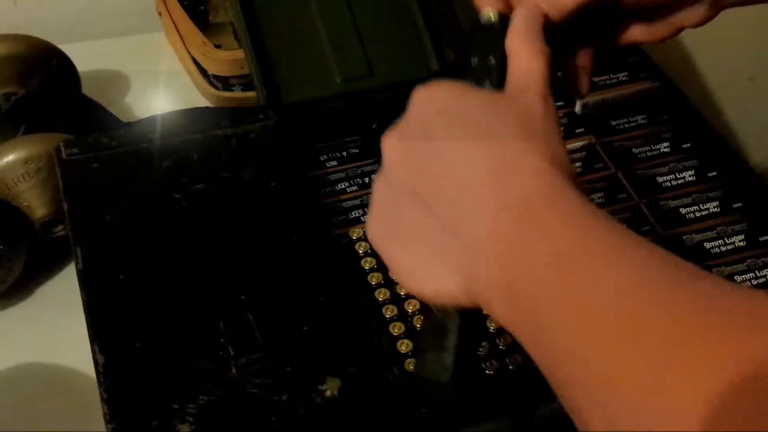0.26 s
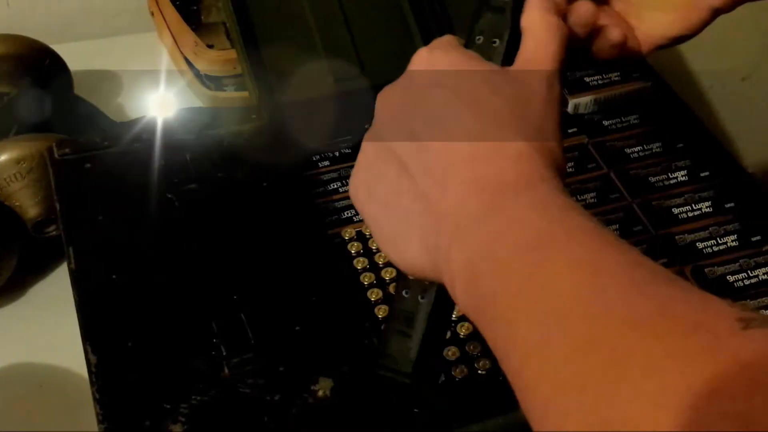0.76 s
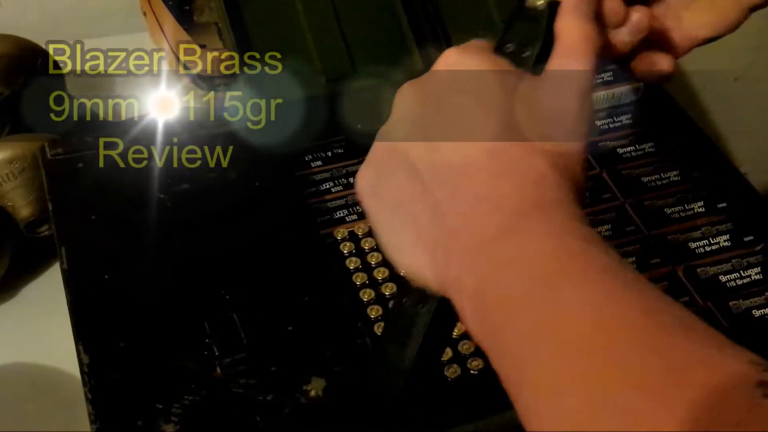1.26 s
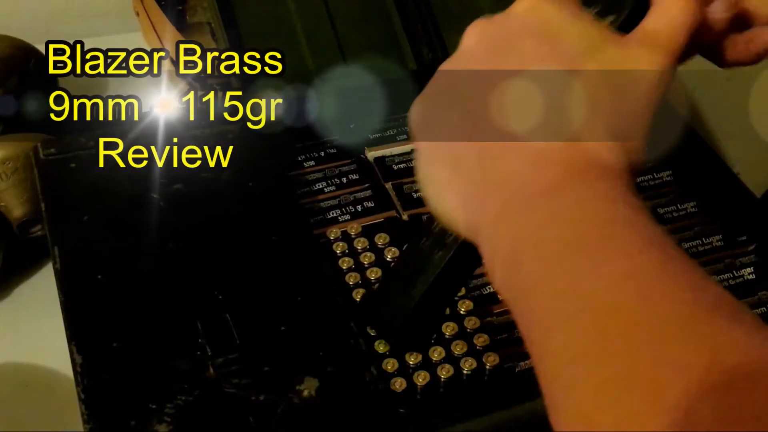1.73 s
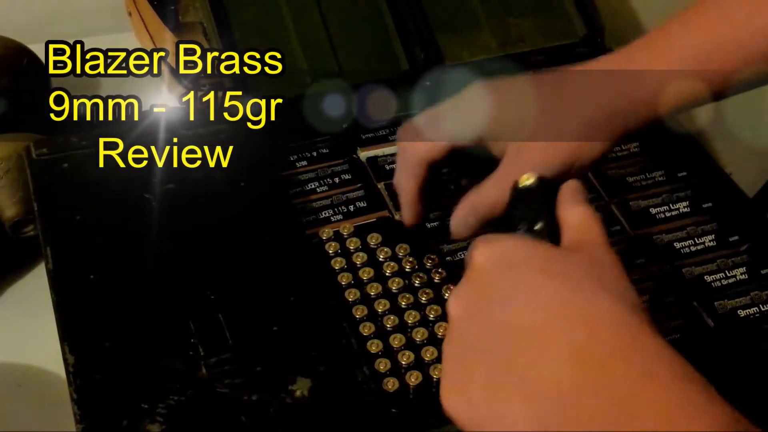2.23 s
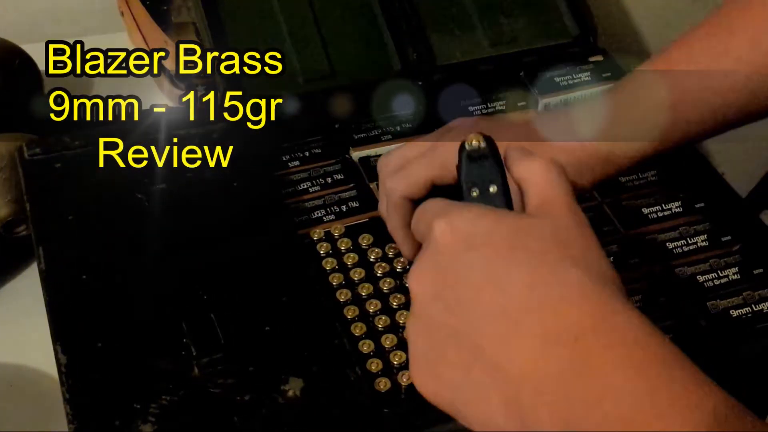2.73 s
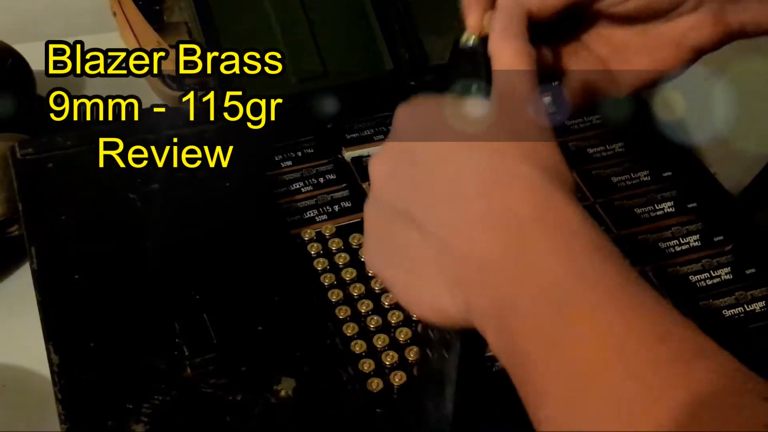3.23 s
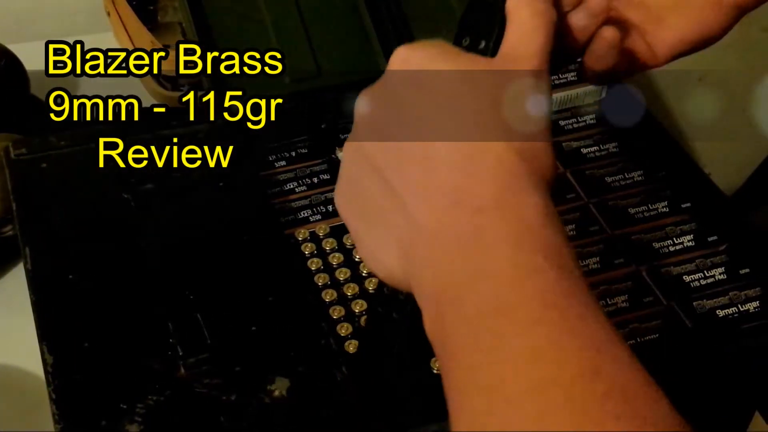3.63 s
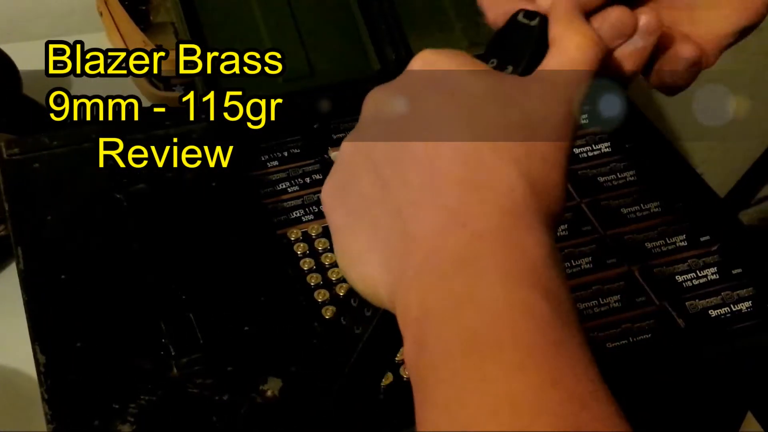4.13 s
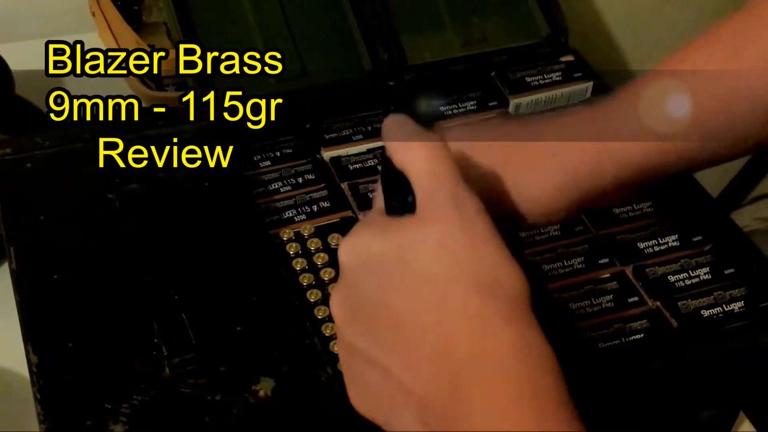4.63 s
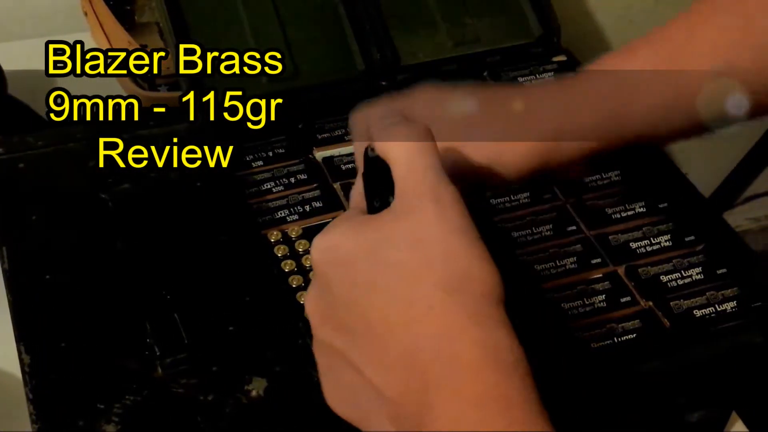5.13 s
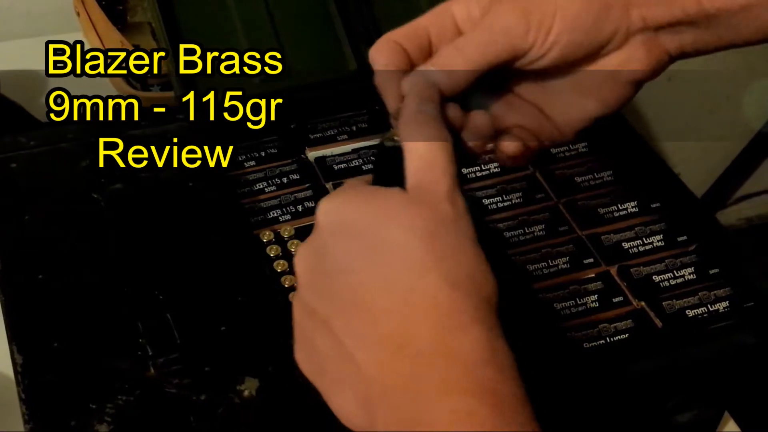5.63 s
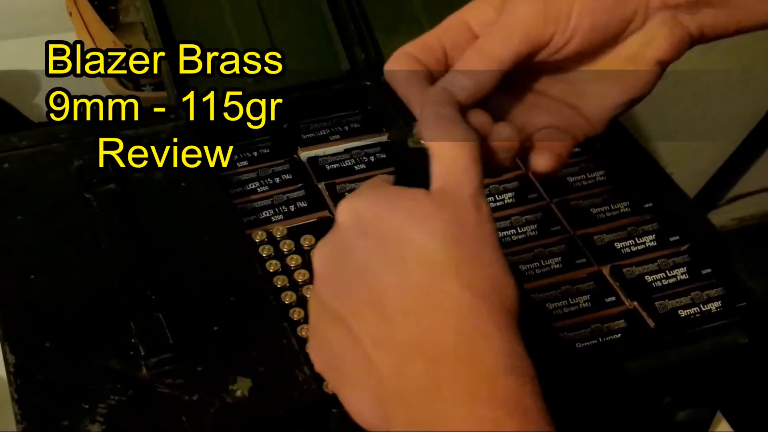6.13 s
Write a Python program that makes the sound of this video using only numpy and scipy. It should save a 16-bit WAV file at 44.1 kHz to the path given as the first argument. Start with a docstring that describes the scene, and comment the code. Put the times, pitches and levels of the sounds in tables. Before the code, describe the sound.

After a blink of silence, a quiet indoor room opens with low fan rumble, faint wavering hum and hiss. Small metallic ticks come at about 0.3 to 0.6 seconds, then weak taps and faint skin-and-brass rubbing until 1.5. From 1.6 to 2.1 a cluster of hard, bright brass-on-steel clicks snaps out, strongest near 1.67, 1.85 and 2.06. Softer, duller plastic tray ticks and slides follow from 2.4, with a clearer knock at 2.94. One moderate click lands at 3.26, then near-quiet. Light ticks at 3.9 lead to the loudest, brightest clatter at 4.28 to 4.43, and a smaller click at 4.56. Tray rattles run from 4.74 to 5.1, a crisp click comes at 5.6, then barely audible touches near 6.15. Everything is close, slightly left, with short diffuse room tails.

```python
"""Loading a magazine at the table

Hands load brass cartridges into a steel pistol magazine over a table, close to a small stereo camera.
Cartridges plucked from a plastic tray and clicks at the feed lips are sharp blows into resonant modes.
Fingers and brass slide in between as grainy noise; a hard-walled room answers with diffuse tails.
Behind it lie a faint fan rumble, a wavering hum and hiss, made of shaped noise and sines."""
import sys
import numpy as np
from scipy import signal
from scipy.fft import rfft, irfft, next_fast_len
from scipy.io import wavfile
from scipy.ndimage import map_coordinates

SR = 44100
rng = np.random.default_rng(int(sys.argv[2]) if len(sys.argv) > 2 else 0)


def digitize_waveform(pressure):
    """Quantize a signal to 16-bit integers and store it at the path in sys.argv[1].

    Rows of a 2-D input are taken as channels; values are limited to [-1, 1].
    """
    field = np.atleast_2d(pressure).T
    bounded = np.clip(field, -1, 1)
    quanta = np.round(bounded * 32767).astype(np.int16)
    wavfile.write(sys.argv[1], SR, quanta)


N = 280961  # length in samples


def magazine_clicks():
    """Brass strikes the loaded steel magazine: a strong first blow, then a brief metallic chatter."""
    # Brass on steel. Each row: start in seconds, peak in dB before panning, thud in dB, brightness in dB,
    # favoured frequency in Hz, lift there in dB, room in dB against the near sound, left-right in dB.
    clicks = [(0.312, -48, 13, -10.5, 9000, 12, -2.5, -2), (0.43, -29, -12.5, -3.5, 4200.0, 10, -3.5, -2.5),
              (0.575, -28, -10.5, 0, 3620.0, 8.5, -0.5, -0.5),
              (0.622, -30.5, -15, -17.5, 3800.0, 8, -4, -2), (0.806, -42, -11, -26, 3400, 1.5, -5.5, -2),
              (0.893, -51, -12, -23, 1990, 11, -9, -4), (1.075, -45, 16, -29.5, 2040, 5, -18, -3),
              (1.155, -50.5, -12, -29, 1990, 10.5, -15, -3.5),
              (1.5316, -53.5, -11, -28.5, 2440, 16, -3, -1.5),
              (1.621, -21.5, -23.5, 8.5, 3440.0, 3.5, 0, -1.5),
              (1.6563, -13.5, -19.5, -1.5, 6890.0, 5, 2, -4.5), (1.67, -7, -7, 8.5, 2670, 5.5, -7.5, -1.5),
              (1.6798, -20.5, -12.5, 6.5, 3280.0, 13, -11.5, 3), (1.8428, -25.5, 0.5, 7, 2480, 11, -1, -2),
              (1.851, -11.5, -6, 4.5, 3620.0, 8.5, -4.5, -2.5),
              (1.915, -25, -17, 9.5, 8000.0, 10, -15.5, -2), (1.922, -17, -19.5, -5, 2470, 2.5, -6, -2.5),
              (1.931, -28.5, -11, -13.5, 3440.0, 12.5, -5.5, 1),
              (2.0527, -22, -18, 14, 4410.0, 3.5, 4, 0.5), (2.0568, -12, -5, 17, 1970, 3.5, -10, -1),
              (2.0622, -17, -8, 2, 2640, 2.5, -4, -2.5), (3.261, -27, -9, 0, 2990, 6, -4, -3.5),
              (3.3235, -37, -37, -18, 5650.0, 3, -7, -2), (3.9182, -45.5, -6, -15, 6240.0, 5.5, 2.5, -3.5),
              (3.938, -41.5, -4.5, -4, 4410.0, 18, -7, 1.5), (3.9435, -28, -24.5, 8, 5940.0, 9.5, -11, -4),
              (3.9611, -31, 0.5, 12.5, 5120.0, 6, -7, 1.5), (4.0685, -43, 13, -8.5, 3800.0, 2, -7, -2),
              (4.1577, -50.5, -16, -25.5, 5120.0, 9.5, -4.5, 1),
              (4.1771, -45.5, -17, -22.5, 6560.0, 8, -6.5, -5),
              (4.2774, -20, 1, 5, 6240.0, 9.5, -4.5, -3.5), (4.3335, -20, 0.5, 15.5, 2200.0, 3, -6.5, 3),
              (4.3368, -12.5, -1, 11, 2640, 13.5, -8, -5.5), (4.3405, -8, -21, 10, 6890.0, -1.5, -1, 0),
              (4.3424, -3.5, -36, 14.5, 6560.0, 8, -7.5, 2),
              (4.3466, -16, -18.5, 13, 2220, 17.5, -7.5, -0.5),
              (4.3617, -15, -17.5, 3.5, 8000.0, 11.5, 4.5, -1),
              (4.4285, -11, -20.5, 1.5, 4300, 5.5, -1, -2), (4.5577, -27.5, -13.5, 3.5, 2760, 4, 3, 0),
              (5.25, -43, -14, -1, 8500, 16, -10, -5), (5.6034, -22.5, -7, 8.5, 2610, 15, -8.5, -4.5),
              (5.6072, -32.5, -27, -8, 2480, 2, -4, 1), (5.7331, -44, -6, -4, 6560.0, 24, -12, -2),
              (6.1167, -58, -2, -17.5, 2687, 7.5, -14, -7), (6.1601, -47.5, -27, -24, 3510, 8, -22, -5)]
    # Modes of the loaded magazine. Each row: frequency in Hz, width in Hz, gain in dB.
    magazine = [(590, 320, 1), (1356, 220, -0.5), (1977, 370, 2), (2333, 270, 2), (2700, 140, 6.5),
                (3170, 220, 3), (3480, 360, 2.5), (4300, 450, 0), (4950, 500, -0.5), (5554, 240, 4),
                (6140, 650, 1), (7290, 460, 1.5), (7940, 400, 3.5), (8737, 340, 3), (9430, 470, 4.5),
                (10805, 1000, 5), (11170, 1000, 3), (15400, 4400, -0.5)]
    return contacts(clicks, magazine, first_db=21, rise_s=0.00017, chatter_s=0.0084, deep_db=-6)


def tray_plucks():
    """Cartridges leave the plastic tray: the first blow stands out less and the chatter sets in slowly."""
    # Cartridges leaving the tray. Each row: start in seconds, peak in dB before panning, thud in dB,
    # brightness in dB, favoured frequency in Hz, lift there in dB, room in dB against the near sound,
    # left-right in dB.
    plucks = [(2.41, -51.5, 16, -19, 2060, 8, -0.5, -1), (2.5144, -57, 3, -34, 1920, 11, 3, -1),
              (2.6745, -46, 0, -38, 2100.0, 12, -5, -6), (2.687, -46, -9, -41, 2080, 7, -8, -12),
              (2.6945, -43.5, 4, -15, 3440.0, 16, -6, -4), (2.8057, -39, -24, -38, 2260, 10, -19, -7),
              (2.817, -38.5, -15, -30, 2100, 8, -4.5, -5), (2.9415, -21, -22, -21.5, 1976, 6.5, -7.5, -3.5),
              (4.7383, -36.5, 4, -17, 2204, 12, -8.5, -4.5), (4.7485, -38, 0, 2, 1910, 10, -15, -9),
              (4.7623, -33.5, 0.5, -31, 2340, 8, -6, -11), (4.892, -38, 1.5, -14, 2200, 10, -1.5, -6),
              (4.9037, -32.5, -4, -22, 2310, 14, -7, -6), (4.9245, -37, 2, -11, 2300, 0, -2, 2),
              (4.9325, -29.5, 1, -15.5, 1930, 11.5, -2.5, -5.5), (4.9763, -51, -4, -35, 2200, 10, -10, -3),
              (5.0302, -39, -2, -39, 2390, 7, -4, -6), (5.1028, -21, -19, -27.5, 2100, -5, -5.5, -2.5),
              (5.1118, -25.5, -14, -39, 3280.0, -1, -8.5, -6), (5.347, -50, -13, -33, 2340, 1, 3.5, 1)]
    # Modes of the plastic tray. Each row: frequency in Hz, width in Hz, gain in dB.
    tray = [(455, 1100, -1), (950, 580, 2), (1310, 750, -2.5), (1927, 240, 2.5), (2095, 66, 6),
            (2432, 205, 3), (2974, 295, 3), (3200, 680, 0), (4370, 690, 2), (5150, 170, 4.5),
            (5970, 530, -1), (9600, 620, 3), (11700, 4300, -15.5)]
    return contacts(plucks, tray, first_db=14, rise_s=0.0038, chatter_s=0.0093, deep_db=2)


def contacts(table, modes, first_db, rise_s, chatter_s, deep_db):
    """Each contact drives the modes with a first blow and spiky smaller ones; the room answers each."""
    soft_lingers = 0.25  # softer contacts chatter longer: dB of t60 per dB; chatter_s is t60 at full scale
    size = 8192
    out = np.zeros((2, N + SR))
    t, hz = np.arange(size) / SR, np.fft.rfftfreq(size, 1 / SR)
    kept = t < t[-1] / 2  # drops the wrapped-round half
    for start_s, peak_db, *spot, room_db, pan_db in table:
        struck_db = rng.normal(0, 1.3, len(modes))  # each contact excites the modes a little differently
        body = 0
        for k, (centre, width, gain_db) in enumerate(modes):
            damping = 1j * hz * width
            resonance = damping / (centre ** 2 - hz ** 2 + damping)
            body = body + (-1) ** k * amp(gain_db + struck_db[k]) * resonance
        # where the blow lands sets the balance of the ranges
        body = body * causal(colour(hz, deep_db, peak_db, *spot))

        t60 = chatter_s * amp(-soft_lingers * peak_db)
        spikes_db = 8.0 * rng.standard_normal(size)
        blows = rng.standard_normal(size) * amp(spikes_db - 60 * t / t60)
        blows = blows * (1 - np.exp(-t / rise_s))
        blows[0] = amp(first_db)

        near = irfft(rfft(blows) * body) * kept
        near = near * amp(peak_db) / np.abs(near).max()
        # the room is driven by the ringing body alone, without the chatter
        radiated = unit(irfft(body) * kept) * np.std(near)
        far = amp(room_db) * signal.fftconvolve(radiated[None], room_tail(), axes=1)

        at = round(start_s * SR)
        # the room leans to one side half as far as the near sound
        out[:, at:at + far.shape[1]] += far * amp([[pan_db / 4], [-pan_db / 4]])
        out[:, at:at + size] += near * amp([[pan_db / 2], [-pan_db / 2]])
    return out[:, :N]


def colour(hz, deep_db, peak_db, thud_db, bright_db, favoured_hz, lift_db):
    """Gain in dB of a blow over the modes: thud below, a slope up to the ring, a lift near the struck spot."""
    deep_hz, thud_hz, hollow_hz, ring_hz, edge_hz = 330, 810, 2210, 8920, 14840  # corners of the slope
    lift_octaves = 0.18
    # louder contacts keep more of the extreme top: 1.1 dB per dB, down to a floor
    edge_db = max(-4 + 1.1 * peak_db, -34.5)
    slope = [(deep_hz, thud_db + deep_db), (thud_hz, thud_db), (hollow_hz, 0),
             (ring_hz, bright_db), (edge_hz, bright_db + edge_db)]
    octaves_away = np.log2((hz + 1) / favoured_hz)
    return along(slope, hz) + lift_db * np.exp(-(octaves_away / lift_octaves) ** 2)


def slides():
    """Skin and brass rub in small grains, each swell and fade with its own share of bright noise."""
    # Strokes of fingers and brass; the first row is the dying tail of clicks made before the sound opens.
    # Each row: strongest moment in seconds, level in dB, brightness in dB, swell in seconds, fade in seconds.
    strokes = [(0.099, -68, -41, 0.021, 0.2), (.314, -74.5, -8, 0.015, 0.04),
               (1.13, -68.5, -28.5, 0.074, 0.052), (1.355, -68, -13.5, 0.057, 0.025),
               (1.53, -73, -25.5, .03, .06), (1.59, -63.5, -4, 0.085, 0.042),
               (2.35, -69.5, -15, 0.036, 0.11), (2.69, -50, -30, 0.021, 0.034),
               (2.808, -56, -31, 0.036, 0.09), (2.52, -77, -31.5, 0.033, 0.093),
               (2.932, -47.5, -20, 0.025, 0.029), (4.085, -55.5, -3, 0.053, 0.02),
               (4.177, -61.5, -5.5, 0.019, 0.051), (4.27, -63, -5.5, 0.034, 0.0084),
               (4.761, -47.5, -9, 0.071, 0.059), (4.902, -49, -14, 0.024, 0.13),
               (5.097, -52.5, 5.5, 0.012, .02), (5.25, -59.5, -6.5, 0.079, 0.12),
               (6.118, -69, -22.5, .02, .025), (6.162, -62, -21, .02, 0.032)]
    # Colour of the rubbing. Each row: frequency in Hz, gain in dB.
    rub_colour = [(150, -35.5), (400, -3.5), (1000, -3.5), (2100, 1), (3500, -3), (6000, -7), (9000, -16),
                  (12000, -30), (16000, -37)]
    split_hz = 4500  # between the dull and the bright part
    range_db = 30  # a row's sound is this far down one swell before or one fade after its peak
    t = np.arange(N) / SR
    grains = rng.standard_normal(N) * amp(4.5 * wobble(300) + 2.3 * wobble(40))
    dull = unit(filtered(grains, lambda hz: amp(along(rub_colour, hz)) / (1 + (hz / split_hz) ** 4)))
    bright = unit(filtered(grains, lambda hz: amp(along(rub_colour, hz)) / (1 + (split_hz / (hz + 1)) ** 4)))
    rub = np.zeros(N)
    for peak_s, level_db, bright_db, swell_s, fade_s in strokes:
        before = (peak_s - t) / max(swell_s, .005)
        after = (t - peak_s) / max(fade_s, .005)
        away = np.maximum(before, after)
        rub += amp(level_db - range_db * away ** 2) * (dull + amp(bright_db) * bright)
    near = rub * amp([[1.5], [-1.5]])  # a little to the left
    far = amp(-4.5) * signal.fftconvolve(rub[None], room_tail(), axes=1)[:, :N]
    return near + far


def room_tail():
    """One diffuse answer of the room, left energy 1; each frequency dies at its own speed."""
    # Decay of the room. Each row: frequency in Hz, t60 in seconds.
    decay = [(500, 0.75), (1300, 0.78), (2500, 0.61), (5000, .5), (9000, 0.36), (14000, 0.15)]
    # Likeness of the room in the two channels. Each row: frequency in Hz, left-right likeness (1 is alike).
    room_alike = [(500, 1), (1650, 0.97), (5000, .85), (15000, 0.93)]
    hz, t, z = signal.stft(rng.standard_normal((2, 3 * SR // 5)), SR, nperseg=256)
    fall = amp(-60 * t / along(decay, hz)[:, None])
    fall = fall * (1 - 0.09 * np.exp(-t / 0.0013))  # starts a touch softer, under 1 dB
    tail = spread(signal.istft(z * fall, SR, nperseg=256)[1], room_alike)
    age = np.arange(tail.shape[1]) / SR
    # single echoes stand out before the field turns diffuse
    echoes = map_coordinates(rng.standard_normal(600), [age * 700], order=1)
    tail = tail * amp(4.5 * np.exp(-age / 0.017) * echoes)
    return np.pad(tail / np.linalg.norm(tail[0]), ((0, 0), (120, 0)))  # 120 samples before the first echo


def camera_ports(hands):
    """The camera body shades its two microphone ports: level and phase differ with frequency."""
    # Shading of the ports. Each row: frequency in Hz, left-right in dB.
    shading = [(300, -0.5), (1200, -2.5), (3000, -0.5), (5000, -0.5), (9000, 0.5), (14000, 1)]
    # Phase between the ports. Each row: frequency in Hz, radians by which left leads.
    lead = [(1000, -.07), (6000, -.07), (9000, .07), (11000, .4), (12400, -.25), (13800, -1.8),
            (16000, -1.1)]
    half = np.array([[.5], [-.5]])  # half the difference to each side
    return filtered(hands, lambda hz: amp(half * along(shading, hz)) * np.exp(1j * half * along(lead, hz)))


def air():
    """A far fan: drifting rumble, a wavering hum and steadier hiss."""
    # Fan and hiss. Each row: frequency in Hz, relative density in dB per Hz.
    air_colour = [(12, -33), (20, -0.5), (38, -8), (142, -18), (234, -16.5), (434, -23), (527, -26),
                  (624, -25.5), (678, -29.5), (897, -31), (1810, -32.5), (2910, -37), (4180, -41.5),
                  (11400, -47.5), (16000, -59)]
    # Likeness of the air in the two channels. Each row: frequency in Hz, left-right likeness (1 is alike).
    air_alike = [(30, 0.67), (180, .87), (550, 0.51), (1650, 0.15), (5000, 0.14), (15000, .1)]
    # Fan hum. Each row: frequency in Hz, level in dB, 2.5 dB under the middle of its wavering amplitude.
    hum_tones = [(120, -77.5), (238, -75)]
    t = np.arange(N) / SR
    pair = spread(rng.standard_normal((2, N)), air_alike)
    noise = unit(filtered(pair, lambda hz: amp(along(air_colour, hz))))
    rumble = filtered(noise, lambda hz: 1 / (1 + (hz / 450) ** 4))
    hiss = noise - rumble
    hum = np.zeros(N)
    for tone_hz, level_db in hum_tones:
        swing = amp(level_db + 2.5 + 4.4 * wobble(22))
        hum += swing * np.sin(2 * np.pi * tone_hz * t + 0.4 * wobble(8.5))
    return amp(-61.5) * (amp(1.3 * wobble(3.2)) * rumble + amp(0.4 * wobble(0.95)) * hiss) + hum


def amp(db):
    """Amplitude factor of a level in dB."""
    return 10 ** (np.asarray(db) / 20)


def unit(x):
    """x scaled to rms 1."""
    return x / np.sqrt(np.mean(x ** 2) + 1e-20)


def along(points, hz):
    """Value at hz between (Hz, value) points on a log axis."""
    f, v = np.transpose(points)
    return np.interp(np.log(hz + 1), np.log(f + 1), v)


def wobble(rate):
    """A smooth random curve, rate knots a second."""
    knots = rng.standard_normal(int(N * rate / SR) + 4)
    return map_coordinates(knots, [np.arange(N) * rate / SR])


def filtered(x, response):
    """x times a complex response of frequency."""
    m = next_fast_len(x.shape[-1] + 4096)
    return irfft(rfft(x, m) * response(np.fft.rfftfreq(m, 1 / SR)), m)[..., :x.shape[-1]]


def causal(gain_db):
    """The response with these gains that starts at the blow (minimum phase, by folding the cepstrum)."""
    c = irfft(np.log(amp(gain_db)))
    c[1:len(c) // 2] *= 2
    c[len(c) // 2 + 1:] = 0
    return np.exp(rfft(c))


def spread(pair, alike):
    """Two unrelated signals mixed to left and right of a given likeness."""
    def mid_side(hz):
        turn = np.arccos(np.clip(along(alike, hz), -1, 1)) / 2
        return np.array([np.cos(turn), np.sin(turn)])
    mid, side = filtered(pair, mid_side)
    return np.array([mid + side, mid - side])


def scene():
    """The hands reach the camera's ports; the air of the room lies under them."""
    hands = magazine_clicks() + tray_plucks() + slides()
    return camera_ports(hands) + air()


def record(dry):
    """The sound opens after a short silence; a steep band limit takes off the top."""
    start_s, top_hz = 0.096, 16400
    opened = dry * (np.arange(N) / SR > start_s)
    return filtered(opened, lambda hz: 1 / (1 + (hz / top_hz) ** 120))


dry = scene()
out = record(dry)
digitize_waveform(out)
```